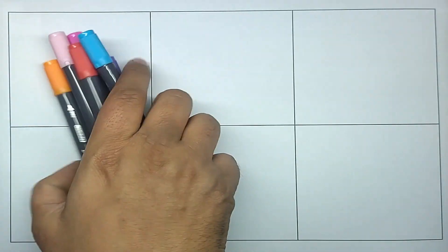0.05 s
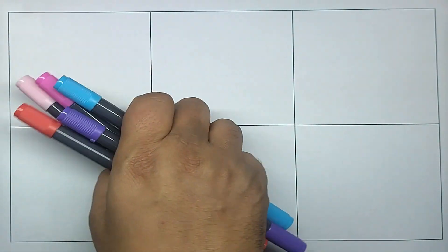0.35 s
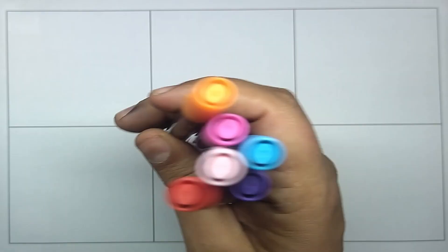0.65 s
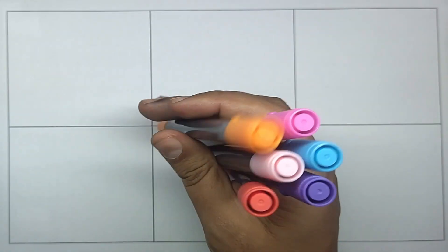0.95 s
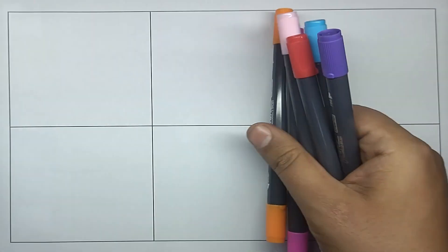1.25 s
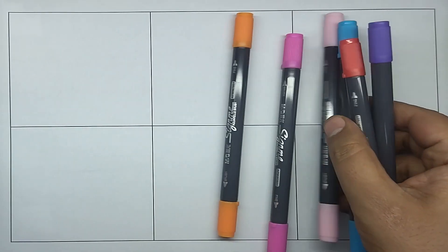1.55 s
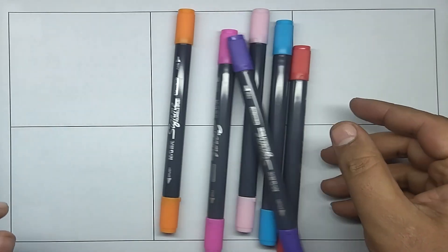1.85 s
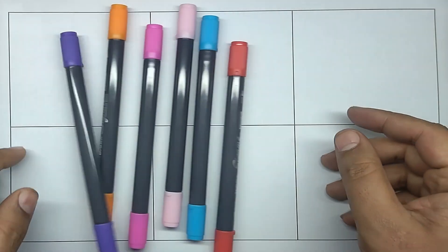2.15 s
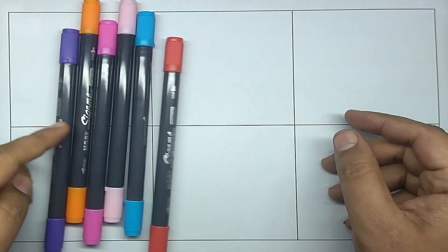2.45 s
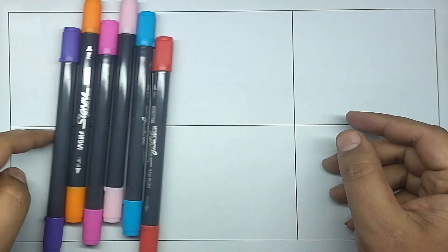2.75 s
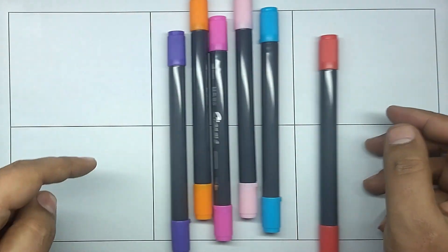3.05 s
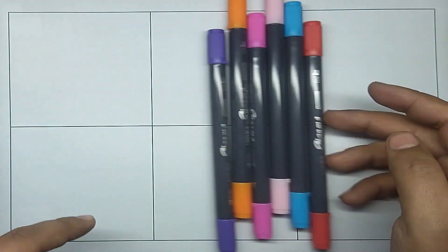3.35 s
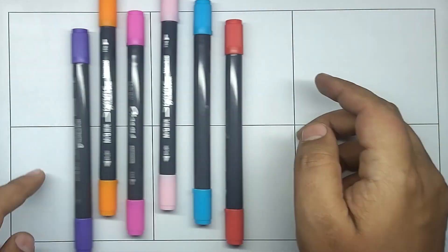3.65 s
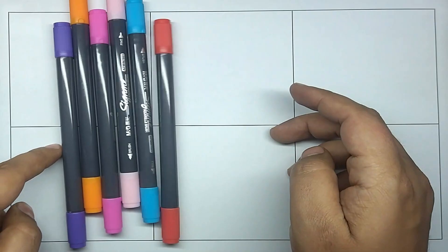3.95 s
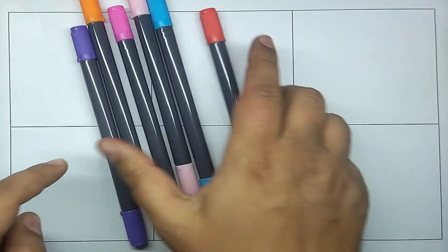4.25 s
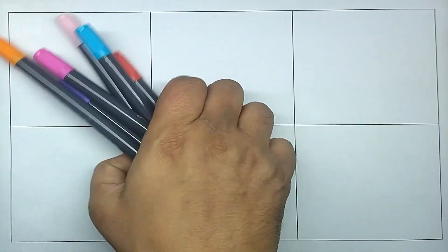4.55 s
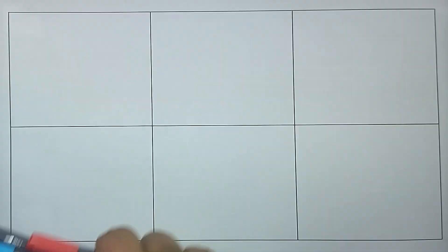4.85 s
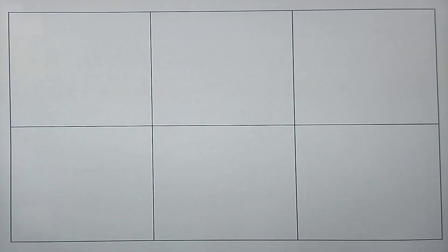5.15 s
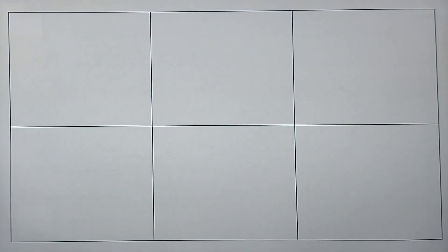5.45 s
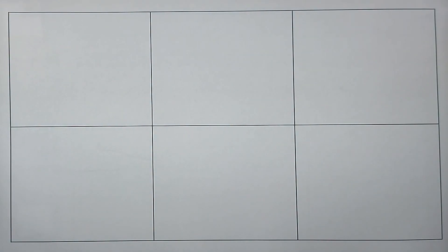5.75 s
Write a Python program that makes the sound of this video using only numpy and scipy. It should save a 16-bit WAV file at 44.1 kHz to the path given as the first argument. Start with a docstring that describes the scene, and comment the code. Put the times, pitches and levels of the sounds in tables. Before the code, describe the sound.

A handful of plastic markers rattles, knocks onto a table, rolls over paper and gets gathered up again, heard close.

```python
"""Plastic felt-tip pens are gathered, stood on a paper-covered table and laid out one by one.
They are rolled left and right, scooped up and carried off. Their caps knock on the table, which booms;
rolling caps bump along and scrape the paper. The hollow barrels rub and click together, and a hand
swishes over the paper. A small bare room echoes, and a close stereo microphone hears it all."""
import sys
import numpy as np
from scipy import signal
from scipy.fft import rfft, irfft
from scipy.io import wavfile
from scipy.ndimage import uniform_filter1d

SR = 44100
rng = np.random.default_rng(int(sys.argv[2]) if len(sys.argv) > 2 else 0)


def file_out(sig):
    """Save sig as 16-bit WAV at sys.argv[1]."""
    # one column per channel
    cols = np.atleast_2d(sig).T
    # limit, then scale
    lim = np.clip(cols, -1, 1)
    pcm = np.round(lim * 32767).astype(np.int16)
    wavfile.write(sys.argv[1], SR, pcm)


N = 255780

# Levels in the tables are relative. A fade time (t60) is how long a sound takes to drop by 60 dB.
# pushes that roll and drag the pens (time [s], length [s], rumble [dB], scrape [dB], fading [dB/s])
PUSHES = [(-0.04, 0.3, -35.5, -41, 15), (0.48, 0.057, -38.5, -53, 13), (0.628, 0.18, -52.5, -73, -27),
          (0.786, 0.12, -41, -36, -18), (1.197, 0.093, -65.5, -57.5, 14), (1.39, 0.1, -42, -33, 57),
          (1.588, 0.074, -49.5, -51, 2), (1.686, 0.064, -37, -37, 7), (1.877, 0.11, -33, -53, 64),
          (2.046, 0.25, -41, -52.5, 18), (2.445, 0.022, -42, -51, 7), (2.527, 0.0031, -36, -44, 29),
          (2.831, 0.089, -46.5, -58, -26), (2.922, 0.055, -55, -40.5, 5), (2.953, 0.16, -35.5, -36.5, 59),
          (3.05, 0.32, -44.5, -44.5, 24), (3.428, 0.2, -48.5, -41.5, 2), (3.543, 0.25, -43, -44.5, 0.5),
          (3.83, 0.86, -41.5, -46.5, 33), (4.317, 0.24, -53.5, -72, 25), (4.472, 0.064, -42, -52, -1),
          (4.579, 0.12, -32.5, -42.5, 40), (4.898, 0.82, -68, -70.5, 0.5), (5.484, 0.089, -68, -56, 4)]
# pens shifting against each other in the hand (time [s], length [s], level [dB])
SHUFFLES = [(-0.02, 0.22, -41.5), (0.11, 0.23, -41), (0.397, 0.096, -45), (0.528, 0.04, -47),
            (0.643, 0.3, -54), (0.776, 0.013, -45.5), (1.056, 0.025, -50.5), (1.204, 0.085, -52),
            (1.356, 0.021, -48), (1.398, 0.024, -40), (1.413, 0.02, -53), (1.712, 0.03, -43),
            (1.867, 0.062, -49), (2.501, 0.029, -50), (2.53, 0.027, -45), (4.487, 0.056, -43),
            (4.584, 0.12, -38.5), (4.671, 0.14, -43), (5.068, 0.02, -56), (5.507, 0.027, -57),
            (5.578, 0.025, -56.5)]
# pens landing on the table (time [s], table thud [dB], cap knock [dB],
# brightness before softening [dB/octave], note of that spot [Hz], start of the treble drop [Hz])
KNOCKS = [(0.023, -39.5, -40, -6, 201, 3020), (0.037, -52, -39, -6, 520, 3180),
          (0.0636, -51, -50, 1, 357, 2500), (0.158, -57, -38, -3.5, 400, 2500),
          (0.1983, -35, -36.5, -4, 183, 5000), (0.2127, -39.5, -50, -10, 326, 2500),
          (0.5091, -38, -54, -10, 395, 1000), (0.528, -33.5, -44, -24, 208, 1000),
          (0.5606, -35, -46, -17, 423, 1510), (0.69, -48, -69, -18, 394, 1000),
          (0.811, -29.5, -27, -3.5, 190, 3530), (0.8923, -22.5, -18.5, -5.5, 352, 2160),
          (0.9089, -28, -18.5, -9.5, 342, 2130), (0.932, -26, -28, -5.5, 467, 2270),
          (1.416, -46, -28, -4.5, 870, 3000), (1.4304, -31, -33, -2.5, 308, 3040),
          (1.4814, -34, -27, -4.5, 860, 3080), (1.497, -55, -58, -10, 770, 2900),
          (1.696, -36.5, -31, -6, 191, 2600), (1.757, -38, -28, -5, 178, 4800),
          (1.8735, -46, -35.5, -4, 794, 3000), (1.8936, -41, -26.5, -4, 764, 4770),
          (1.914, -66, -48, -12, 796, 4500), (1.939, -49, -34.5, -12, 294, 3930),
          (1.999, -40.5, -34.5, -10, 186, 2000), (2.066, -37.5, -65, 2.5, 201, 1000),
          (2.1617, -39.5, -43, -6, 193, 1500), (2.2422, -41, -43, -9, 414, 890),
          (2.301, -35.5, -42, -4, 328, 4800), (2.3522, -26, -26.5, -8.5, 709, 890),
          (2.48, -49, -47, -27, 680, 910), (2.565, -53, -37.5, -12, 745, 4700),
          (2.578, -59, -67, -17, 490, 910), (2.976, -37, -37, -4, 317, 2800),
          (2.9997, -35.5, -36.5, -7.5, 710, 2400), (3.0685, -39.5, -34, -8.5, 319, 2550),
          (3.1618, -47, -38.5, -9.5, 336, 1920), (3.198, -56, -39, -9.5, 774, 1930),
          (3.316, -59, -44.5, -14.5, 730, 1800), (3.4036, -66, -43.5, -12, 610, 1710),
          (3.606, -57, -41, -6, 696, 2000), (3.82, -51, -45, -10, 318, 1500),
          (3.855, -45, -39.5, -7, 316, 1900), (3.925, -50, -51, -4, 308, 1500),
          (4.022, -44, -56, -1, 700, 1500), (4.205, -52, -51, -5, 332, 995),
          (4.227, -63, -48, -9, 700, 990), (4.3495, -53, -50, -14, 700, 1450),
          (4.6117, -35, -24.5, -4, 317, 6700), (4.6316, -31, -49, -13, 207, 2000),
          (4.668, -45, -34.5, -4, 324, 5000), (4.6781, -47.5, -33.5, -5, 197, 5000),
          (4.8048, -46, -44, -5.5, 188, 4500), (5.0993, -39, -54.5, 0, 313, 5960)]
# pens tapping each other (time [s], level [dB], brightness [dB/octave], ring of that pen [Hz],
# fade time of the chatter [s], left over right [dB])
CLICKS = [(0.026, -54.5, -11, 2160, .012, -3), (0.067, -46.5, 2, 4450, 0.017, 4),
          (0.0985, -33, 4.5, 2670, 0.0092, -2), (0.109, -49, 6, 2640, .012, 2),
          (0.1258, -37, 3.5, 4100, 0.011, 2), (0.171, -46, 1, 2750, 0.012, 5),
          (0.176, -39.5, 3.5, 3180, 0.024, 2), (0.1975, -39, 5, 3900, 0.021, 0),
          (0.203, -42, 7, 4420, 0.011, -6), (0.406, -58, -8, 2420, 0.012, 6),
          (0.413, -46, -2, 2820, 0.016, 2), (0.4233, -46.5, -1.5, 2400, 0.024, 8),
          (0.4271, -48.5, 5, 3050, .012, 2), (0.436, -48, -3, 3320, 0.014, 2),
          (0.471, -43, 0.5, 3910, 0.03, 0), (0.481, -47, 3, 4330, 0.016, 1),
          (0.5424, -47.5, 4.5, 5200, .01, 10), (0.5465, -37, 3.5, 2920, .012, 0.5),
          (0.5607, -42.5, 6, 4770, .008, 0), (0.6467, -59, 4, 6640, .012, 3),
          (0.6608, -52, 9, 6750, 0.019, 3), (0.668, -60, 5, 6370, .01, 0.5),
          (1.062, -68, 11, 2360, .012, -5.5), (1.0873, -50.5, 1, 2340, 0.016, -2),
          (1.2187, -44.5, 3, 4470, 0.014, 5), (1.2345, -45.5, 5, 5180, 0.0097, 5.5),
          (1.3766, -46, 7, 11230, 0.012, 6), (1.4813, -41, -6.5, 3940, 0.0049, 4),
          (1.614, -61, 5, 2830, 0.015, 1), (1.63, -57.5, 8, 2240, 0.015, 1),
          (1.6733, -45, -2, 2720, 0.015, 3), (1.695, -56.5, 10.5, 4300, 0.012, 5),
          (1.72, -42, -2, 2580, 0.01, 5), (1.7355, -42, 0.5, 2340, 0.013, 10),
          (1.7572, -44, 4, 8060, 0.011, 4), (1.874, -54, -4, 3940, .012, -2),
          (1.8932, -35.5, -2.5, 7600, .007, 6), (1.937, -50, -0.5, 3150, .008, -18),
          (1.965, -57, 9, 2440, .009, 5), (1.973, -60, 5, 3400, .009, 5), (1.999, -62, 0, 3400, .007, 4),
          (2.064, -64.5, 15, 2180, 0.0064, 4), (2.0749, -55, -5.5, 3140, 0.016, 3),
          (2.132, -70, 11, 4500, 0.011, 3), (2.142, -63, 6, 3400, .009, 6),
          (2.1602, -58.5, 4, 15000, 0.0066, 1.5), (2.239, -71, 9, 8600, 0.009, 3),
          (2.3, -47, -7.5, 4100, 0.012, 1), (2.301, -53.5, 6, 5160, 0.012, 4),
          (2.321, -63, -16, 4130, .016, -2), (2.3499, -44.5, 4, 10200, 0.0057, 3.5),
          (2.5, -54.5, 10, 8200, 0.014, 2), (2.524, -53, 10.5, 3620, 0.014, -1),
          (2.547, -48, 6, 3380, 0.015, 2), (2.5594, -45.5, 3, 4700, .014, -2),
          (3.068, -57, 2, 14200, .007, 1), (4.016, -55.5, 1, 3020, .007, 0),
          (4.4969, -49.5, 4.5, 4660, 0.02, 7), (4.534, -49, 3, 4160, 0.023, 6),
          (4.6115, -27.5, 1.5, 6060, 0.011, 0.5), (4.6148, -33, -0.5, 3750, .014, 10),
          (4.7566, -44.5, 6, 5370, .01, -6), (4.764, -48.5, -6, 4370, 0.018, 7),
          (4.792, -46, 3, 3400, 0.013, 4), (4.803, -48, 2, 2640, 0.025, -2),
          (5.071, -64, -1, 3600, .012, 4), (5.09, -47.5, 4.5, 3700, .012, 1),
          (5.3042, -65.5, 1.5, 3470, .01, 2.5), (5.462, -60.5, 2.5, 3050, .01, 1),
          (5.5091, -62.5, -5, 4620, 0.017, 6), (5.591, -53, 1, 2430, 0.0099, 1)]
# sweeps of a hand over the paper (time [s], length [s], level [dB])
SWIPES = [(1.385, 0.024, -55), (2.818, 0.03, -64.5), (2.852, 0.072, -46), (3.124, 0.12, -64.5),
          (3.385, 0.051, -60), (3.424, 0.052, -33.5), (3.627, 0.37, -69), (3.859, 0.074, -50.5),
          (3.978, 0.1, -59), (4.12, 0.051, -59), (4.389, 0.13, -65)]

# notes that the table and the hollow barrels ring with (pitch [Hz], level [dB], fade time [s])
TABLE_NOTES = [(126.5, 7.5, 0.14), (184, 13, 0.54), (196.8, 18, 0.23), (244.5, 13, 0.18),
               (318.5, 17.5, 0.19), (371, -2.5, 0.096), (426, 2.5, 0.17), (456.5, 11.5, 0.4),
               (500, 2, 0.25), (569.5, 10, 0.33), (742, 3, 0.037), (798, 4.5, 0.1), (868, 8, 0.6),
               (1070, 4.5, 0.19), (1128, 11.5, 0.2), (1278, 5, 0.19), (1425, -1, 0.22), (1640, 0, 0.16),
               (1823, 8.5, 0.13)]
BARREL_NOTES = [(2160, -17.5, 0.1), (2210, -10, 0.17), (2430, -2.5, 0.085), (2760, 6, 0.056),
                (3350, 14.5, 0.054), (4230, 6, 0.03), (4370, 0.5, 0.036), (4700, 7, 0.04),
                (5265, 12.5, 0.019), (5800, -15, 0.039), (6600, -9, 0.03), (9350, -16, 0.045)]

# tone of the room's hush and of each kind of friction (frequency [Hz], level [dB])
AIR_TONE = [(15, -29), (25, -21), (130, -4.5), (659, -23.5), (4490, -31), (5730, -38.5), (6560, -32),
            (7310, -39), (11300, -37), (12500, -36.5), (16000, -38.5)]
ROLL_TONE = [(40, -30.5), (90, -24), (140, -10), (200, -5), (320, -5), (450, -5.5), (700, -5), (1000, -27),
             (2000, -29.5), (5000, -91)]
BUMP_TONE = [(100, -24.5), (200, -8.5), (700, 3), (1300, -4), (2200, -12.5), (3200, -18.5), (7000, -35)]
SCRAPE_TONE = [(300, -36.5), (600, 3), (850, 1), (1300, 1.5), (2200, -3), (3000, -16), (4500, -28),
               (7000, -54.5), (12000, -65)]
RUB_TONE = [(800, -15.5), (2000, -4), (3000, -1.5), (4600, 1), (5600, -5.5), (6500, -3.5), (7400, -11),
            (9500, -5), (11200, -14.5), (12000, -9.5), (15500, -16)]
TICK_TONE = [(2000, -2), (6000, -2.5), (12000, 0.5)]
SWIPE_TONE = [(500, -30), (1500, -9), (2800, 1), (4500, 5.5), (6300, 2), (7500, -0.5), (9500, 4.5),
              (11400, -3.5), (13500, -1.5), (16000, -7.5)]
# tone of the parts that get hit, and of the pens' plastic (frequency [Hz], level [dB])
BOARD_TONE = [(30, -20), (80, -25), (120, -14), (180, -6), (400, -5.5), (900, -6.5), (2400, -28),
              (5000, -23), (16000, -29)]
CAP_TONE = [(60, -32), (200, -17.5), (500, 2.5), (1000, -2.5), (2400, 0), (3600, 0), (9000, -7.5),
            (16000, -19)]
RIM_TONE = [(200, -41.5), (800, -9.5), (2400, -3), (4500, 0), (9000, 5), (16000, 0)]
BARREL_TONE = [(60, -22), (200, -3), (500, -4.5), (1200, 1.5), (2500, -2.5), (5000, -4), (10500, -9),
               (13500, -6), (16000, -8)]
PLASTIC_TONE = [(1500, -1), (2300, 2), (3300, -1), (4600, 2), (5500, -2.5), (6400, 3), (7500, -4),
                (9500, 1.5), (11400, -5.5), (12500, -4.5), (16000, -6.5)]

# how long the room echoes (frequency [Hz], fade time [s])
ECHO_FADE = [(150, 1.1), (500, 0.58), (1500, 0.56), (4000, 0.55), (8000, 0.35), (15000, 0.48)]
# tone of the echo, and how much of a blow the walls throw back (frequency [Hz], level [dB])
ECHO_TONE = [(100, -3), (250, 1.5), (600, 1), (1200, 5), (2500, 5), (5000, 0.5), (9000, 1), (15000, 0.5)]
WALL_TONE = [(200, -1.5), (700, 0.5), (2500, 1), (5000, 0.5), (7000, -2.5), (14000, -1)]
# how alike scattered sound is on the left and right (frequency [Hz], likeness [0-1])
LIKENESS = [(30, 0.9), (125, 0.75), (250, 1), (500, 0.5), (900, 0.02), (16000, 0)]
# balance of the microphone (frequency [Hz], left over right [dB])
BALANCE = [(120, 0), (260, -0.5), (500, -1), (1000, -1), (2000, -0.5), (4000, -1), (8000, 3), (13000, 3)]


def amp(db):
    """Turns decibels into a factor to multiply by."""
    return 10 ** (np.asarray(db) / 20)


def normalised(x):
    """Scales a sound to an average power of 1."""
    return x / np.sqrt(np.mean(x ** 2) + 1e-20)


def look_up(points, hz):
    """Reads between the rows of a table, on a logarithmic frequency scale."""
    row_hz, value = np.transpose(points)
    return np.interp(np.log(hz + 1), np.log(row_hz + 1), value)


def add(mix, start, sound):
    """Mixes a stereo sound in at a start time in seconds."""
    part = mix[:, max(round(start * SR), 0):][:, :sound.shape[1]]
    part += sound[:, :part.shape[1]]


def convolve(x, response):
    """Lets every sample set off a copy of the response; keeps the length."""
    return signal.fftconvolve(x, np.atleast_2d(response), axes=1)[:, :x.shape[1]]


def shaped(x, *tones, size=4096):
    """Filters a sound by the sum of the tone curves."""
    hz = abs(np.fft.fftfreq(size, 1 / SR))
    log_gain = np.log(amp(sum(look_up(tone, hz) for tone in tones)))
    spectrum = np.exp(signal.hilbert(log_gain).conj())  # minimum phase: nothing rings before a hit
    return convolve(x, np.fft.ifft(spectrum).real[:size // 2])


def tilt(centre_hz, level_db, db_per_octave, lowest_hz):
    """Tone curve of a blow: the harder the contact, the more treble."""
    return [(hz, level_db + db_per_octave * np.log2(hz / centre_hz)) for hz in (lowest_hz, 10600)]


def peak(hz, lift_db, octaves=0.26):
    """Tone curve that favours one note."""
    return [(hz / 2 ** octaves, 0), (hz, lift_db), (hz * 2 ** octaves, 0)]


def stereo(noise):
    """Blends two noises: long waves reach both sides of the microphone alike, short ones differ."""
    same = np.clip(look_up(LIKENESS, np.fft.rfftfreq(noise.shape[1], 1 / SR)), 0, 1)
    a, b = rfft(noise)
    mid, side = a * np.sqrt((1 + same) / 2), b * np.sqrt((1 - same) / 2)
    return irfft([mid + side, mid - side], noise.shape[1])


def ringing(x, notes, gain_db):
    """The fading notes that a body adds when a sound shakes it."""
    t = np.arange(SR // 2) / SR
    response = np.zeros(len(t))
    for hz, db, t60 in notes:
        fade = np.log(1000) / t60
        response += amp(db) * 2 * fade / SR * np.exp(-fade * t) * np.cos(2 * np.pi * hz * t)
    return amp(gain_db) * convolve(x, response)


def echo(x, gain_db, build_s=0.002, early_s=0.042):
    """Reflections crowd in from the near walls, then each frequency fades at its own pace."""
    noise = stereo(rng.standard_normal((2, SR)))
    hz, frame_s, bands = signal.stft(noise, SR, nperseg=256)
    fade = np.exp(-np.log(1000) * frame_s / look_up(ECHO_FADE, hz)[:, None])
    tail = signal.istft(bands * fade, SR, nperseg=256)[1][:, :SR]
    t = np.arange(SR) / SR
    tail = tail * (1 - np.exp(-(t / build_s) ** 2)) * (1 + np.exp(-t / early_s))
    return amp(gain_db) * convolve(x, shaped(normalised(tail) / np.sqrt(SR), ECHO_TONE))


def contact(push_db, chatter_t60, ring_db, ring_t60, settle_s=0.00085, size=4096, notes=26):
    """One touch of plastic: a sharp push, a noisy chatter and a few random notes of the barrel."""
    t = np.arange(size) / SR
    chatter = stereo(rng.standard_normal((2, size))) * np.exp(-np.log(1000) * t / chatter_t60)
    offset, left_phase, right_phase = rng.random((3, notes, 1))
    hz = 1200 + 14000 * ((np.arange(notes)[:, None] + offset) / notes) ** 1.4
    ring = np.sin(2 * np.pi * (hz * t + np.array([left_phase, right_phase]))).sum(1)
    ring *= np.exp(-np.log(1000) * t / ring_t60)
    blow = (normalised(chatter) + amp(ring_db) * normalised(ring)) / np.sqrt(size)
    blow *= 1 - np.exp(-t / settle_s)
    blow[:, 0] += amp(push_db)
    for channel, delay_s in zip(blow, rng.uniform(0.2, 1, 2) * 0.001198):
        channel += 0.65 * np.interp(t - delay_s, t, channel, left=0)  # sound bounces off the table top
    return normalised(blow) / np.sqrt(size)


def grains(per_s, spread_db, hiss_db):
    """Friction: tiny catches of uneven size over a smooth hiss."""
    sizes = amp(spread_db * np.minimum(rng.exponential(1, N), 3.3))
    sizes *= rng.random(N) < per_s / SR
    catches = normalised(sizes * rng.standard_normal((2, N)))
    return stereo(catches + amp(hiss_db) * rng.standard_normal((2, N)))


def ticking(per_s, spread_db, chatter_t60, ring_db, ring_t60, pens=6):
    """Pens tick at random moments, each with a ring of its own."""
    out = np.zeros((2, N))
    for _ in range(pens):
        sizes = amp(spread_db * np.minimum(rng.exponential(1, N), 2))
        sizes *= rng.random(N) < per_s / pens / SR
        out += convolve(np.array([sizes, sizes]), contact(-8.5, chatter_t60, ring_db, ring_t60))
    return out


def wandering(x, depth_db):
    """The point of contact moves, so the notes that it stirs up come and go."""
    bands = signal.stft(x, nperseg=256, noverlap=192)[2]
    patches = uniform_filter1d(rng.standard_normal(bands.shape[1:]), size=4, axis=0)  # smooth in pitch
    patches = uniform_filter1d(patches, size=24, axis=1)  # and in time
    bands = bands * amp(depth_db * normalised(patches))
    return signal.istft(bands, nperseg=256, noverlap=192)[1][:, :N]


def movement(start, length, level_db, fade_db_per_s, rise_s, stop_db_per_s):
    """Loudness of one movement: it takes hold, fades (or swells, if negative), then dies away."""
    t = np.maximum(np.arange(N) / SR - start, 0)
    fall_db = fade_db_per_s * np.minimum(t, length) + stop_db_per_s * np.maximum(t - length, 0)
    return (1 - np.exp(-(t / rise_s) ** 2)) * amp(level_db - fall_db)


def pushes(scrape=False):
    """Rumble or scrape loudness of each push: it takes hold quickly; let go, the pens run down."""
    for start, length, rumble_db, scrape_db, fade in PUSHES:
        level_db = scrape_db if scrape else rumble_db
        yield movement(start, length, level_db, fade, rise_s=0.016, stop_db_per_s=135.5)


def shuffles():
    """Loudness of each shuffle: the pens shift in the hand, then settle."""
    return (movement(*row, fade_db_per_s=37.5, rise_s=0.011, stop_db_per_s=165) for row in SHUFFLES)


def follow(sound, movements, gain_db):
    """Makes a steady sound follow the movements, whose powers add up."""
    return normalised(sound) * amp(gain_db) * np.sqrt(sum(gain ** 2 for gain in movements))


def room_air():
    """The faint, steady hush of the room."""
    return amp(-66) * normalised(shaped(stereo(rng.standard_normal((2, N))), AIR_TONE))


def rolling():
    """Ridges on the caps run over the table, whose low notes rumble."""
    bumps = shaped(grains(per_s=400, spread_db=2, hiss_db=-11), ROLL_TONE)
    rumble = bumps + ringing(bumps, TABLE_NOTES, gain_db=2.5) + echo(bumps, gain_db=1.5)
    return follow(rumble, pushes(), gain_db=-5)


def bumping():
    """Each rolling pen drops off the ridges of its cap in small separate bumps."""
    bumps = ticking(per_s=50, spread_db=3, chatter_t60=0.014, ring_db=-6, ring_t60=0.02)
    bumps = shaped(bumps, BUMP_TONE)
    patter = bumps + ringing(bumps, TABLE_NOTES, gain_db=-5.5) + echo(bumps, gain_db=0)
    return follow(patter, pushes(scrape=True), gain_db=-8)


def scraping():
    """Caps catch on the paper fibres and shake the table."""
    catches = shaped(grains(per_s=1900, spread_db=1.5, hiss_db=-7.5), SCRAPE_TONE)
    rasp = catches + ringing(catches, TABLE_NOTES, gain_db=4) + echo(catches, gain_db=-4.5)
    return follow(rasp, pushes(scrape=True), gain_db=-7.5)


def rubbing():
    """Smooth plastic sticks and slips in a fine fizz."""
    slips = shaped(grains(per_s=1600, spread_db=-3, hiss_db=10), RUB_TONE)
    slips = wandering(slips, depth_db=3)
    fizz = slips + ringing(slips, BARREL_NOTES, gain_db=-17) + echo(slips, gain_db=6.5)
    return follow(fizz, shuffles(), gain_db=-3)


def jostling():
    """Loose pens tick against each other while the handful shifts."""
    ticks = ticking(per_s=130, spread_db=3.5, chatter_t60=0.006, ring_db=-4, ring_t60=0.014)
    ticks = shaped(ticks, RUB_TONE, TICK_TONE)
    return follow(ticks + echo(ticks, gain_db=-1.5), shuffles(), gain_db=-8)


def knocking(thud_hz=245, cap_hz=793, soften_db_per_octave=2.8):
    """A cap hits the table: the board thuds, the plastic chatters and snaps, barrel and table ring."""
    hits, shove = np.zeros((2, N)), np.zeros((2, 4096))
    shove[:, 0] = 1
    for start, thud_db, cap_db, brightness, note_hz, edge_hz in KNOCKS:
        force = [(thud_hz, thud_db + 2.5)]
        force += tilt(cap_hz, cap_db, brightness - soften_db_per_octave, lowest_hz=cap_hz)
        treble_drop = [(edge_hz, 0), (edge_hz * 2 ** 0.19, -6.5)]  # a contact takes time, dulling it
        chatter = contact(push_db=-13, chatter_t60=0.065, ring_db=2.5, ring_t60=0.011)
        chatter = shaped(chatter, force, treble_drop, CAP_TONE, PLASTIC_TONE)
        snap = contact(push_db=-8, chatter_t60=0.011, ring_db=-4, ring_t60=0.016)
        snap = shaped(snap, force, treble_drop, RIM_TONE, PLASTIC_TONE)
        thud = shaped(shove, force, peak(note_hz, lift_db=8), BOARD_TONE)
        thud = thud + ringing(thud, [(note_hz, 0, 0.22)], gain_db=-8.5)  # this spot's note rings on
        add(hits, start, thud + chatter + snap)
    hits *= amp(34.5)
    hits += ringing(hits, BARREL_NOTES, gain_db=-14.5)
    return hits + ringing(hits, TABLE_NOTES, gain_db=-1) + echo(shaped(hits, WALL_TONE), gain_db=-3.5)


def clicking(centre_hz=4900):
    """Pen taps pen: a dry snap, a chatter and the brief ring of soft plastic."""
    direct, to_walls, snap = np.zeros((2, N)), np.zeros((2, N)), np.zeros((2, 4096))
    snap[:, 0] = 1
    for start, level_db, brightness, ring_hz, t60, pan_db in CLICKS:
        blow = contact(push_db=-4, chatter_t60=t60, ring_db=-6, ring_t60=1.4 * t60, settle_s=0.0003)
        # every place on a pen has peaks and dips of its own
        quirks = np.column_stack([np.linspace(1800, 16000, 22), 4.5 * rng.uniform(-1, 1, 22)])
        blow = normalised(shaped(blow, quirks)) / np.sqrt(blow.shape[1])
        force = tilt(centre_hz, level_db, brightness, lowest_hz=2200)
        tones = force, peak(ring_hz, lift_db=9), BARREL_TONE, PLASTIC_TONE
        add(direct, start, amp([[pan_db / 2], [-pan_db / 2]]) * shaped(blow, *tones))
        add(to_walls, start, shaped(snap, *tones))  # walls hear all sides, so the quirks even out
    ring = ringing(direct, BARREL_NOTES, gain_db=-10)
    return amp(31.5) * (direct + ring + echo(shaped(to_walls, WALL_TONE), gain_db=-5.5))


def swiping():
    """Skin brushes over paper: a bright, scratchy swish that fades as the hand lifts."""
    fibres = shaped(grains(per_s=2200, spread_db=6, hiss_db=-1), SWIPE_TONE)
    fibres = wandering(fibres, depth_db=2)
    sweeps = (movement(*row, fade_db_per_s=4, rise_s=0.019, stop_db_per_s=180) for row in SWIPES)
    return follow(fibres + echo(fibres, gain_db=2), sweeps, gain_db=-3.5)


def scene():
    """Adds up the pens, the hand and the hush of the room."""
    pens = knocking() + clicking() + rolling() + bumping() + scraping() + rubbing() + jostling()
    return pens + swiping() + room_air()


def record(dry, lag_s=0.000253, cutoff_hz=16150):
    """The microphone's left side hears things a little sooner and brighter; the top treble is cut."""
    hz = np.fft.rfftfreq(N, 1 / SR)
    left = amp(look_up(BALANCE, hz) / 2)
    right = np.exp(-2j * np.pi * hz * lag_s) / left
    channels = irfft(rfft(dry) * np.array([left, right]), N)
    low_pass = signal.firwin(511, cutoff_hz, window=("kaiser", 9), fs=SR)
    return signal.oaconvolve(channels, low_pass[None], "same")


dry = scene()
out = record(dry)
file_out(out)
```